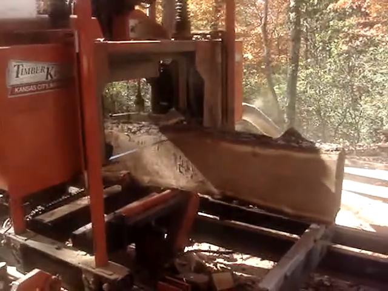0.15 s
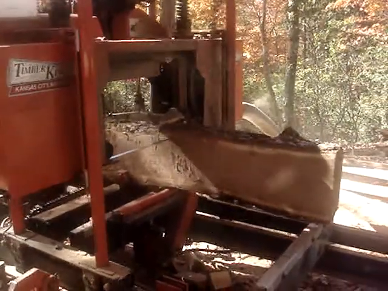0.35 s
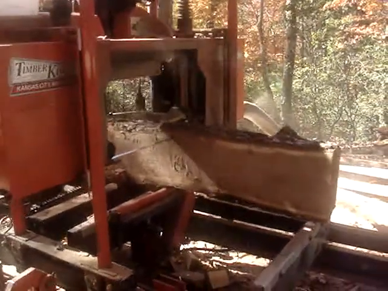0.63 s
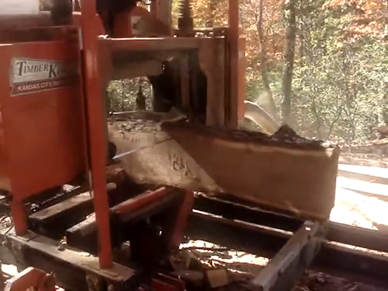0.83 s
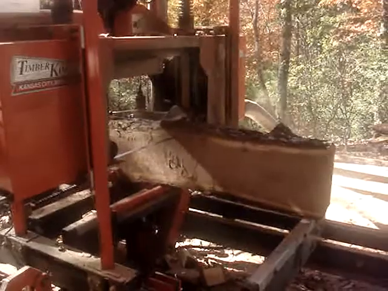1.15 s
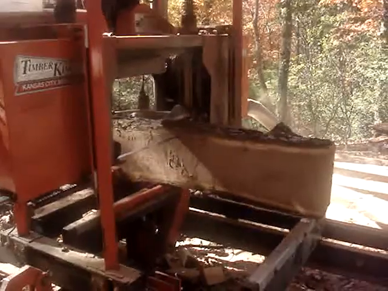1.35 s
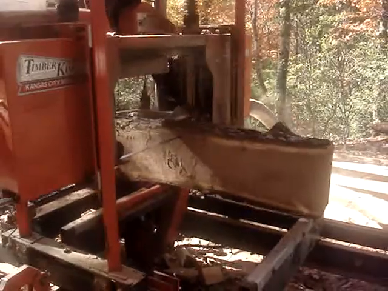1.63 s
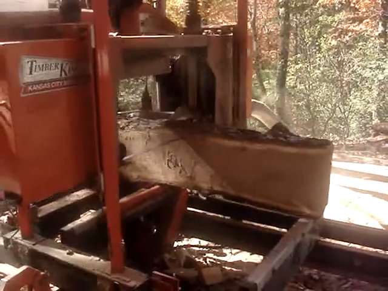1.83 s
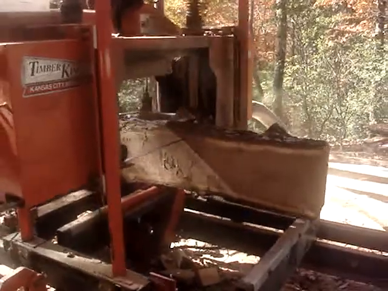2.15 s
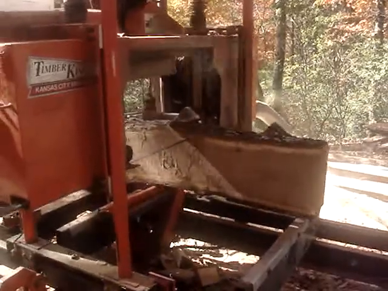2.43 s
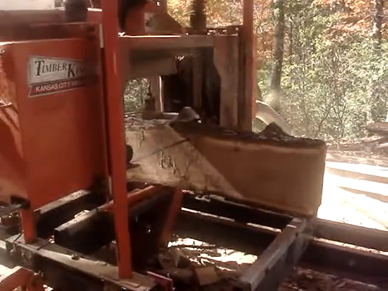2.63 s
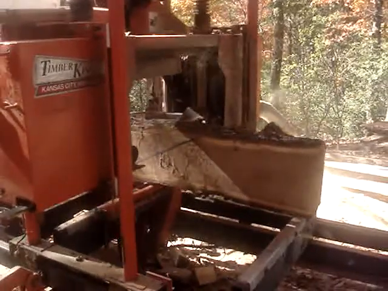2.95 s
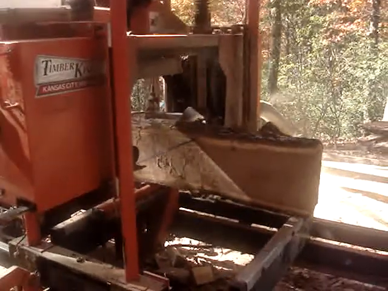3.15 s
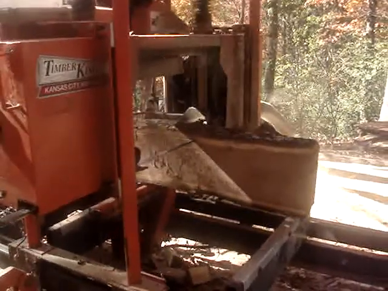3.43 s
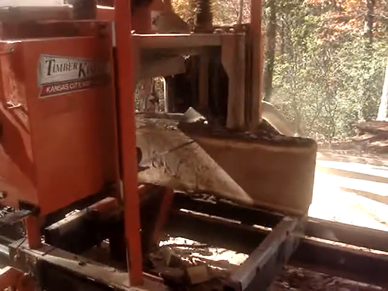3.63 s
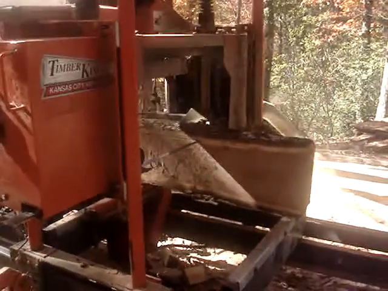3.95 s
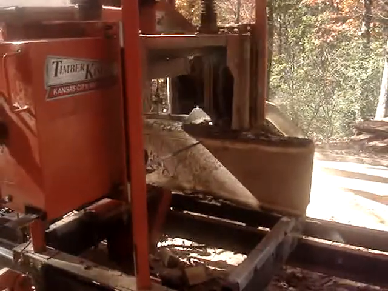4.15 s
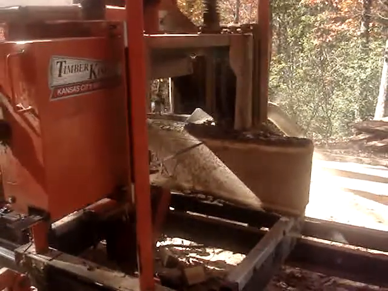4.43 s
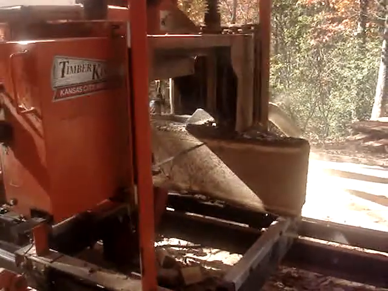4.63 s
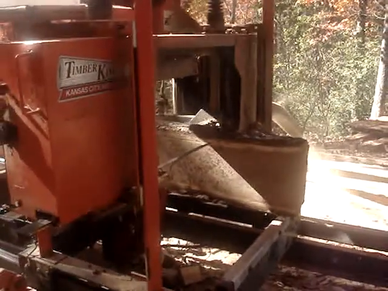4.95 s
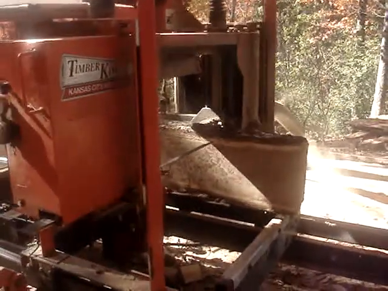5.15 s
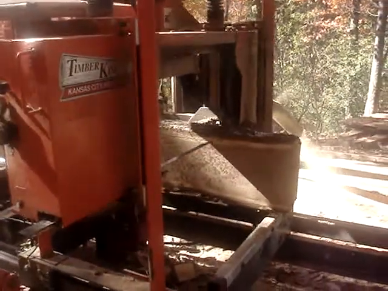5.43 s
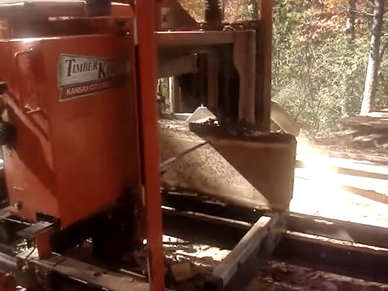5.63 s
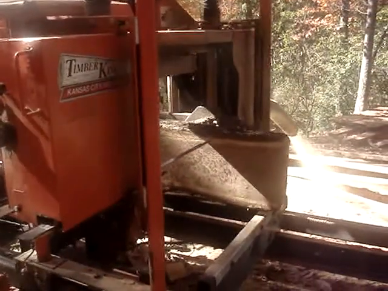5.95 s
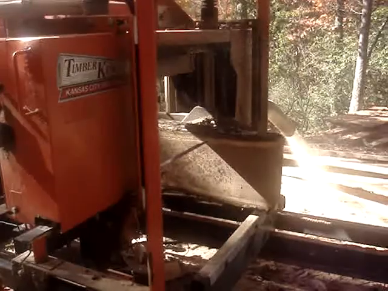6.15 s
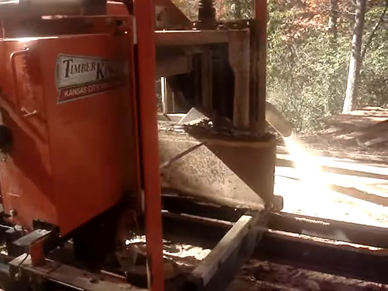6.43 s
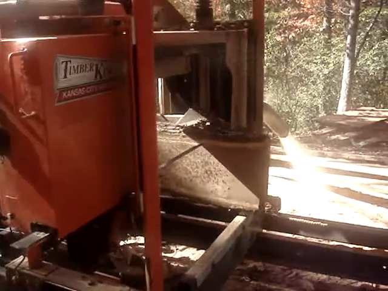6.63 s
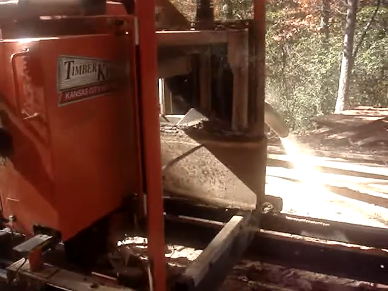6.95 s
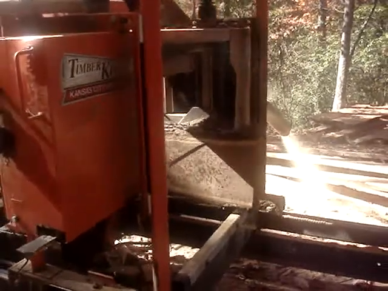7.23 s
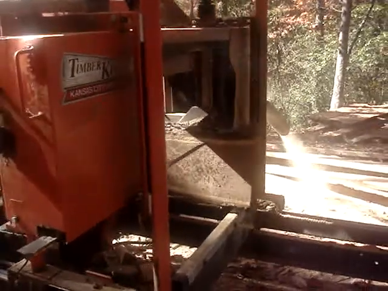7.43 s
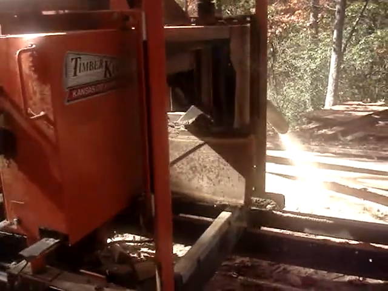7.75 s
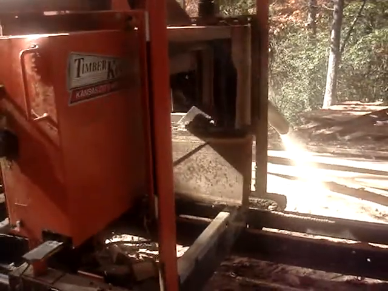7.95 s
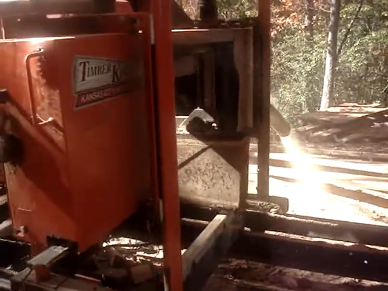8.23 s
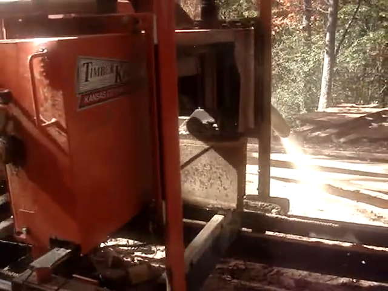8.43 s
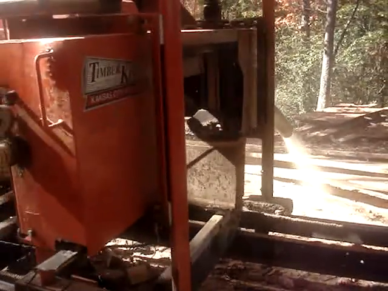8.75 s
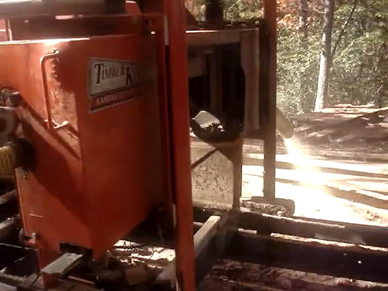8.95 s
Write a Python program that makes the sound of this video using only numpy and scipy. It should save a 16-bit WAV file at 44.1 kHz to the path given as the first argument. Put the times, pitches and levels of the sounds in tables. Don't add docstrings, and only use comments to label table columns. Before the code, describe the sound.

A petrol-engined band sawmill runs without a break through a log, heard outdoors from a few metres with little echo. Dense rasping and hissing dominate, fluttering quickly with the turning wheels. Under it lies a weak low engine drone that sinks at times; above it a rough roller whine and narrow metallic blade tones swell and fade. The treble is slightly grainy and ends dully near the top.

```python
import sys
import numpy as np
from scipy import signal
from scipy.fft import rfft, irfft, next_fast_len
from scipy.io import wavfile
from scipy.ndimage import uniform_filter1d

SR = 44100
rng = np.random.default_rng(int(sys.argv[2]) if len(sys.argv) > 2 else 0)


def pcm_store(signal):
    levels = np.round(np.clip(np.atleast_2d(signal), -1, 1) * 32767)
    wavfile.write(sys.argv[1], SR, levels.astype(np.int16).T)


def undo_db(level):
    steps = np.asarray(level, float) / 20
    return 10 ** steps


N = 401310
STEP = 64

ENGINE_PER_ROLLER, WHEEL_PER_ROLLER, PULLEY_PER_ROLLER = .26, .163, .221
TONE_REACH, RING_REACH = .2, .15
ROLL_OFF_HZ, CUTOFF_HZ = 9900, 10240
WEAK_HZ, WEAK_DB = 4500, -4.0

# t/s, speed/(turns per s)
ROLLER_SPEED = [(0.09, 110.52), (0.6, 111.7), (0.86, 112.15), (1.37, 111.36), (2.14, 111.42), (2.65, 111.1),
                (3.41, 111.29), (3.92, 111.56), (4.44, 111.96), (4.69, 111.59), (5.46, 111.7),
                (6.22, 112.3), (6.48, 112.69), (6.99, 112.49), (7.24, 111.98), (7.76, 112.04),
                (8.52, 112.77), (8.99, 112.52)]
# multiple/1, rms level/dB, swell/dB, place along the cut/(0-1)
ENGINE_ORDERS = [(2, -71, 3, 0), (4, -70, -2, 0.3), (5, -60, -3, 0.8), (6, -63, -1, 1), (7, -68, -6, 1),
                 (9, -74, 10, 0.25), (10, -64, 5, 0.75), (10.55, -67, 5, 0.65), (11.15, -65, 9, 1),
                 (12, -67, -3, 0.85), (13, -66, -9, 0.8), (14, -70, 4, 0.1), (15, -64, 2, 0.5),
                 (16, -65, 4, 0.3), (19, -63, -4, 0.05), (23, -60, 8, 0.25), (24, -58, -7, 0.15),
                 (33, -71, 12, 0.2), (38, -63, 11, 0.35), (48, -60, 5, 0.85), (55, -56, 6, 0.9)]
# multiple/1, rms level/dB, swell/dB, place along the cut/(0-1)
EXHAUST_ORDERS = [(8, -56.5, 0, 0)]
# middle t/s, length/s, level/dB
EXHAUST_LULLS = [
    (1.9, .5, -4),
    (2.9, 1.5, -7),
    (4.05, .7, 3),
    (4.6, .5, -7),
    (6.1, .5, -5),
    (8.35, 1, -8),
]
# multiple/1, rms level/dB, swell/dB, place along the cut/(0-1)
ROLLER_ORDERS = [(14, -60, 4, 0.55), (15, -54, -9, 1.0), (16, -53, -1, 0.95), (17, -52, -2, 0.35),
                 (23, -51, -5, 0.15), (24, -50, -6, 0.9), (27, -57, 6, 0.4), (29, -56, 7, 0.25),
                 (30, -52, -11, 0.8), (31, -55, 2, 0.0), (32, -51, -7, 0.9), (34, -60, 5, 0.3),
                 (35, -55, 1, 0.3), (36, -58, 6, 0.2), (37, -53, 6, 0.1), (38, -53, 2, 0.3),
                 (39, -57, 4, 1.0), (40, -58, 2, 0.25), (41, -61, 12, 0.65), (42, -60, 8, 0.8),
                 (43, -51, -8, 0.95), (45, -58, 5, 0.55), (46, -51, -8, 0.95), (47, -55, 2, 0.95),
                 (48, -54, 6, 0.65), (52, -51, -4, 0.95), (53, -52, 4, 0.4), (54, -57, 7, 0.3),
                 (60, -52, -3, 0.95), (62, -55, 5, 0.5)]
# t/s, bite of the teeth level/dB, hardness of the grain level/dB
CUT_COURSE = [(0.0, -27, 1), (0.05, -26.5, 1), (2.51, -28, -0.5), (2.61, -27.5, -0.5), (5.42, -27.5, -0.5),
              (6.21, -29, 0), (7.86, -28.5, 0), (8.08, -30.5, 0.5), (8.54, -29, 0), (8.87, -26.5, 0),
              (9.1, -28.5, 1)]
PART_HZ = [700, 2300, 4000, 6000]
# share of bite/1, share of hardness/1, gain as the head travels/dB
PART_SHARES = [
    (1.1, -1.0, 0.5),
    (0.89, -.4, -.5),
    (1.1, .3, -0.3),
    (.95, .6, 1.5),
]
# f/Hz, level/(dB per Hz)
KERF_SPECTRUM = [(25, -8.5), (95, -16.5), (165, -18), (215, -7.5), (400, -18.5), (520, -2.5), (813, -5),
                 (1490, -3), (2400, -2.5), (3750, -6), (4500, -6), (5600, -3), (8000, -2), (9700, -3)]
# f/Hz, width/Hz, level/dB, swell/dB, place along the cut/(0-1)
SAW_MODES = [(217, 39, -61.5, -4, .31), (580.5, 99, -49.5, 2.5, 0.54), (636.5, 63, -50, -5, 0.7),
             (1000, 71, -49, -1.5, .95), (1101.5, 25, -51, 4, 0.44), (1223, 103, -47, -2.5, 0.72),
             (1657, 60, -54.5, -6, 0.9), (2069, 74, -49, -10, 1), (2390, 216, -47, 3, 0),
             (2690, 94, -47, 4.5, .15), (2991, 49, -54.5, 8, 0.45), (3290, 250, -51.5, 6, 0.43),
             (455.3, 30, -58, 2.5, .45),
             (4150, 110, -51, 2, .02), (4744, 81, -51, 3, .6), (5137, 120, -44.5, -5.5, .83),
               (5380, 100, -49.5, 6, .08), (5590, 91, -49, 4.5, .4), (5887, 170, -48.5, 2, .2),
               (6210, 200, -48, 6.5, .05), (6614, 310, -42, -2, .72), (7116, 150, -45, -10, 0.94),
               (7790, 410, -46.5, 6, .1), (8010, 200, -46, -3, .6), (8380, 350, -47, 5.5, 0.8),
               (8940, 390, -49.5, 4, 0.2)]
# middle t/s, length/s, f/Hz, width/Hz, peak level/dB
SINGING_TONES = [(.1, .6, 4110, 30, -48), (.2, .5, 6500, 150, -41), (.7, 1.4, 7750, 120, -46),
                 (1.0, 1.0, 6700, 150, -42), (1.4, 1, 5550, 90, -43), (1.5, .9, 4150, 50, -48),
                 (2.8, .9, 8100, 150, -45), (2.9, 1.0, 4240, 40, -44), (2.9, 1.6, 2690, 40, -46.5),
                 (4.2, 1.4, 5840, 70.4, -42), (4.8, 1.0, 6900, 150, -45), (4.9, .9, 4800, 50, -49),
                 (5.85, 1.1, 5390, 40, -43), (5.8, 0.71, 4600, 30, -49), (6.3, 1.8, 8770, 90, -45.5),
                 (7.6, 1.1, 8420, 130, -47), (7.5, .9, 4620, 60, -46), (7.7, .6, 5950, 80, -45),
                 (8.8, .8, 8130, 130, -42), (8.85, .7, 5330, 130, -42)]
# middle t/s, length/s, low f/Hz, high f/Hz, level/dB
OPPOSED_BURSTS = [(0.434, 0.068, 4930, 7240.0, -38.3), (1.49, 0.039, 8010.0, 9910.0, -42.0),
                  (2.907, 0.044, 7320.0, 9220.0, -41.3), (3.927, 0.042, 8010.0, 9910.0, -42.0),
                  (3.997, 0.041, 4390.0, 6460.0, -40.8), (4.555, 0.04, 4310.0, 6030.0, -40.6),
                  (5.183, 0.042, 4000, 5340.0, -44.9), (5.624, 0.044, 6200.0, 8530.0, -41.8),
                  (5.879, 0.041, 8180.0, 9910.0, -43.2), (6.595, 0.086, 4020, 5360, -45),
                  (6.622, 0.044, 7920.0, 9910.0, -43), (6.831, 0.044, 7320.0, 9390.0, -40.1),
                  (7.27, 0.044, 4900, 7920.0, -39.6), (7.388, 0.044, 8100.0, 9910.0, -41.3),
                  (8.433, 0.041, 7920.0, 9820.0, -43.1)]


def rms_one(x):
    return x / np.sqrt(np.mean(x ** 2) + 1e-20)


def in_time(rows):
    t, *columns = np.transpose(rows)
    return [np.interp(np.arange(N) / SR, t, column) for column in columns]


def stretch(points):
    ends = np.append(points, [points[-1], points[-1]])
    lines = ends[:-1, None] + np.diff(ends)[:, None] * np.arange(STEP) / STEP
    return lines.ravel()[:N]


def drift(rate_hz):
    pole = np.exp(-2 * np.pi * rate_hz * STEP / SR)
    run_in = 3000
    noise = rng.standard_normal(N // STEP + run_in)
    slow = signal.lfilter([1], [1, -2 * pole, pole * pole], noise)[run_in:]
    return rms_one(slow - slow.mean())


def swell(db, swell_db, place, reach):
    travel = np.linspace(0, 1, N // STEP)
    return db + swell_db * np.exp(-((travel - place) / reach) ** 2 / 2)


def hump(middle, length):
    t = np.arange(N // STEP) * STEP / SR
    return np.cos(np.pi * np.clip((t - middle) / length, -.5, .5)) ** 2


def throb(turns, depth_db):
    return depth_db * (np.cos(2 * np.pi * turns) + .6 * np.cos(4 * np.pi * turns))


def band(x, low_hz, high_hz):
    return signal.sosfilt(signal.butter(2, [low_hz, high_hz], "band", fs=SR, output="sos"), x)


def ring(noise, hz, width):
    return rms_one(band(noise, hz - width / 2, hz + width / 2))


def tones(turns, orders, gain_db, slow_db, fast_db, blur):
    out = np.zeros(N)
    for multiple, *level in orders:
        level_db = gain_db + swell(*level, TONE_REACH)
        level_db = level_db + slow_db * drift(0.93) + fast_db * drift(7.1)
        cycles = multiple * turns + rng.random() + stretch(blur * drift(6.8))
        out += stretch(undo_db(level_db)) * np.sin(2 * np.pi * cycles)
    return np.sqrt(2) * out


def engine(turns):
    return tones(turns, ENGINE_ORDERS, gain_db=0.0, slow_db=0.9, fast_db=1.4, blur=.04)


def exhaust(turns):
    lull_db = sum(db * hump(middle, length) for middle, length, db in EXHAUST_LULLS)
    note = tones(turns, EXHAUST_ORDERS, gain_db=0.0, slow_db=.3, fast_db=0.8, blur=.04)
    return stretch(undo_db(lull_db)) * note


def roller_whine(turns):
    return tones(turns, ROLLER_ORDERS, gain_db=-0.4, slow_db=1.5, fast_db=2.5, blur=0.07)


def singing():
    white, out = rng.standard_normal(N), np.zeros(N)
    for middle, length, hz, width, db in SINGING_TONES:
        gain = undo_db(db + 1.5 * drift(12)) * hump(middle, length)
        out += stretch(gain) * ring(white, hz, width)
    return out


def blade_and_frame(roller):
    white, out = rng.standard_normal(N), np.zeros(N)
    for hz, width, *level in SAW_MODES:
        gain = undo_db(swell(*level, RING_REACH) + 0.44 * drift(2.5) + 2.0 * drift(11.7))
        out += stretch(gain) * ring(white, hz, width)
    bite_db = in_time(CUT_COURSE)[0]
    swing_db = bite_db - uniform_filter1d(bite_db, size=SR)
    throb_db = throb(roller, .35) + throb(WHEEL_PER_ROLLER * roller, .4)
    return out * undo_db(0.9 * swing_db) * undo_db(throb_db)


def cut_levels():
    bite_db, hard_db = np.array(in_time(CUT_COURSE))[:, :N // STEP * STEP:STEP]
    travel = np.linspace(0, 1, N // STEP)
    levels_db = np.array(PART_SHARES) @ [bite_db, hard_db, travel]
    return levels_db - levels_db.mean(axis=1, keepdims=True)


def kerf(roller):
    levels_db = cut_levels()
    white = rng.standard_normal((2, N))
    edges = 25 * 2 ** np.arange(0, 8.8, .25)
    feed_db = .4 * drift(10) + 0.67 * drift(30)
    spectrum_hz, spectrum_db = np.transpose(KERF_SPECTRUM)
    parts = np.zeros((4, N))
    for k, (low, high) in enumerate(zip(edges, edges[1:])):
        place = np.interp(np.log(low), np.log(PART_HZ), np.arange(4))
        near = np.clip(1 - np.abs(place - np.arange(4)), 0, 1)
        gain_db = np.interp(np.log(low * high) / 2, np.log(spectrum_hz), spectrum_db) + near @ levels_db
        gain_db += (1 - 0.81 * near[3]) * feed_db
        gain_db += 0.27 * drift(0.96) + 0.55 * drift(16)
        parts[np.argmax(near)] += stretch(undo_db(gain_db)) * band(white[k % 2], low, high)
    wheel = WHEEL_PER_ROLLER * roller
    firing = 2 * ENGINE_PER_ROLLER * roller
    parts[0] *= undo_db(throb(firing, 0.59) + throb(wheel, 0.3))
    parts[1:3] *= undo_db(throb(PULLEY_PER_ROLLER * roller, .45) + throb(wheel, .4))
    parts[3] *= undo_db(throb(roller, .62) + throb(wheel, .3))
    return undo_db(-29.5) * rms_one(parts.sum(axis=0))


def scene():
    roller = np.cumsum(in_time(ROLLER_SPEED)[0]) / SR
    cycles = ENGINE_PER_ROLLER * roller
    machine = engine(cycles) + exhaust(cycles) + roller_whine(roller)
    shudder = stretch(undo_db(.15 * drift(14) + .45 * drift(50)))
    teeth = shudder * (blade_and_frame(roller) + kerf(roller))
    return np.tile(machine + singing() + teeth, (2, 1))


def thin_treble(x):
    hz, _, z = signal.stft(x, SR, nperseg=256, noverlap=192)
    rows = (hz > WEAK_HZ).nonzero()[0][:33]
    frames = z.shape[1] // 4 * 4
    cells = z[rows, :frames].reshape(11, 3, -1, 4)
    power = np.mean(np.abs(cells) ** 2, axis=(1, 3), keepdims=True)
    need = uniform_filter1d(power, size=40, axis=2) * undo_db(2 * WEAK_DB)
    need[0] *= undo_db(-4.0)
    need[-1] *= undo_db(2.5)
    z[rows, :frames] = (cells * np.where(power < need, .06, 1)).reshape(len(rows), -1)
    return signal.istft(z, SR, nperseg=256, noverlap=192)[1][:N]


def opposed_hiss():
    out, hz = np.zeros(N), np.fft.rfftfreq(4096, 1 / SR)
    for middle, length, low_hz, high_hz, db in OPPOSED_BURSTS:
        size = int(length * SR)
        inside = (hz > low_hz + 250) & (hz < high_hz - 200)
        noise = irfft(rfft(rng.standard_normal(4096)) * inside)[:size]
        at = int(middle * SR) - size // 2
        out[at:at + size] += undo_db(db + 5.0) * rms_one(noise) * np.hanning(size)
    return out * [[1], [-1]]


def roll_off(x):
    return signal.sosfilt(signal.butter(12, 11190, fs=SR, output="sos"), x)


def record(dry):
    size = next_fast_len(N)
    thinned = thin_treble(dry[0]) + opposed_hiss()
    over = (np.fft.rfftfreq(size, 1 / SR) - ROLL_OFF_HZ) / (CUTOFF_HZ - ROLL_OFF_HZ)
    over = np.clip(over, 0, 2)
    response = undo_db(-70 * over ** 2.6) * (over < .85)
    mix = irfft(rfft(thinned, size) * response, size)[:, :N]
    return roll_off(mix)


dry = scene()
out = record(dry)
pcm_store(out)
```